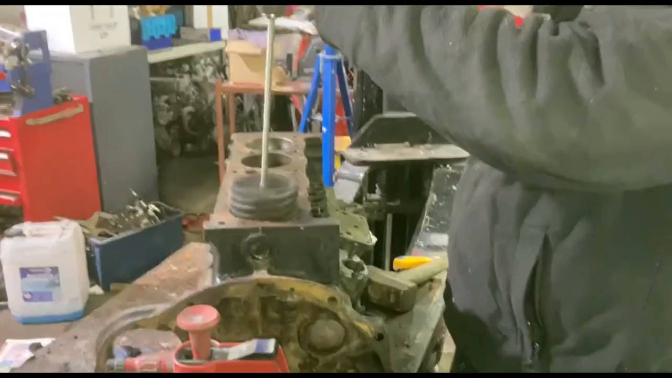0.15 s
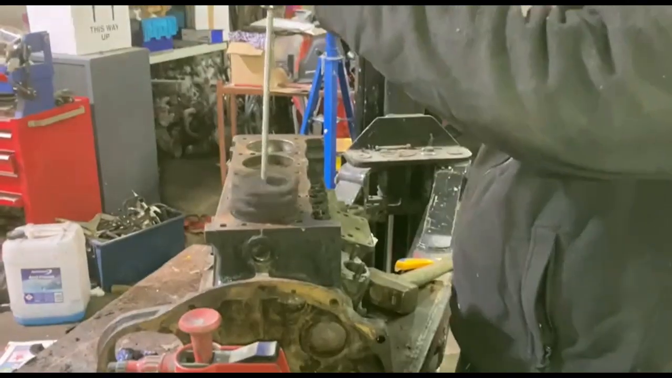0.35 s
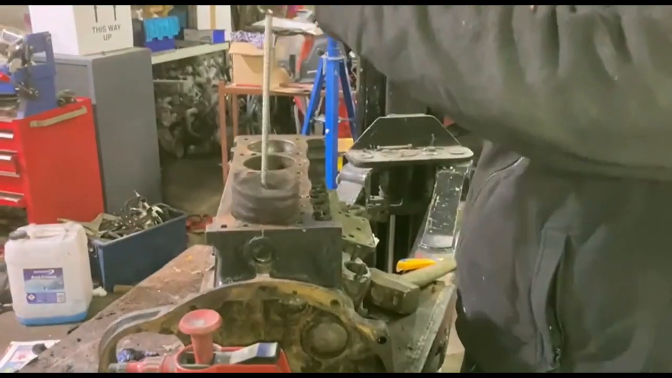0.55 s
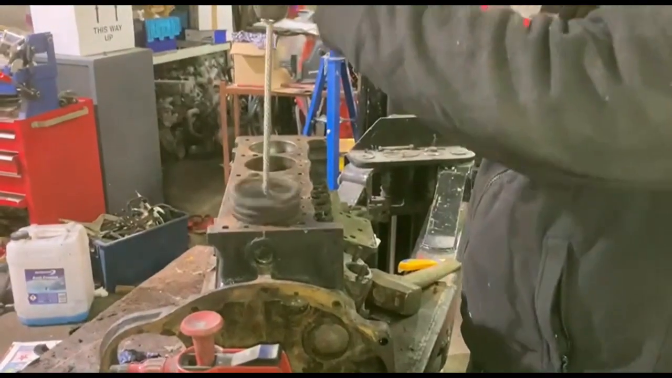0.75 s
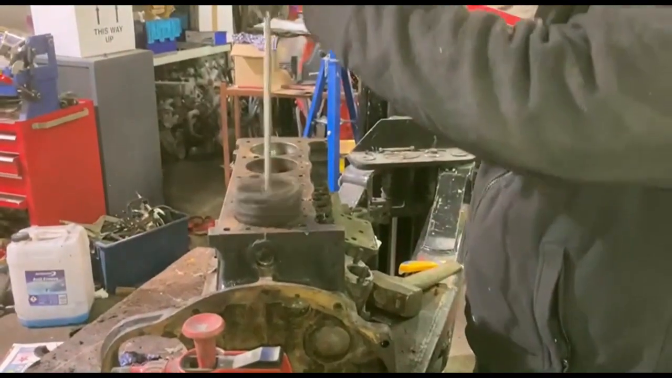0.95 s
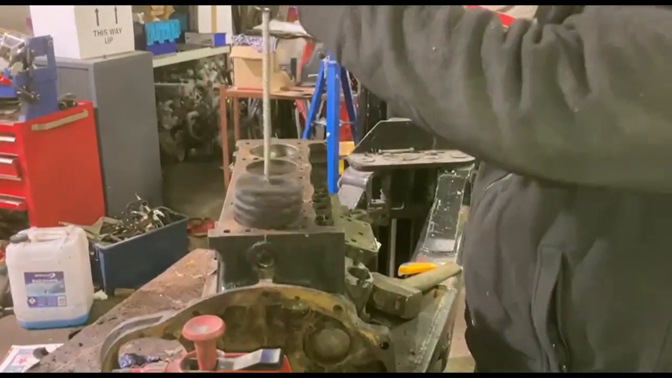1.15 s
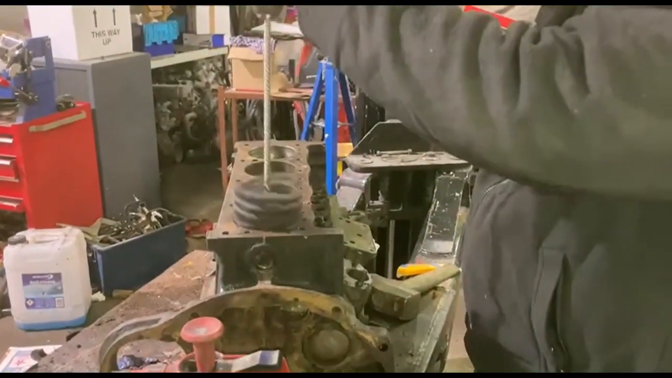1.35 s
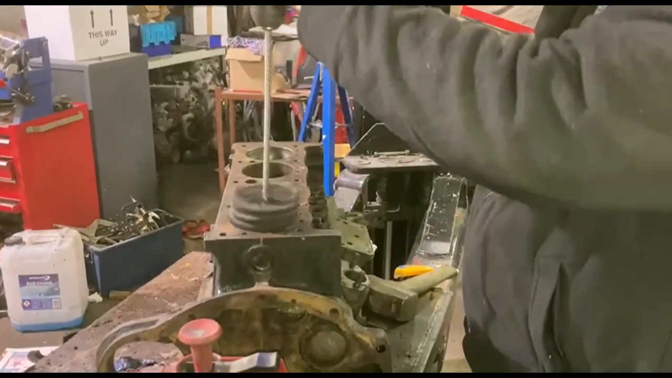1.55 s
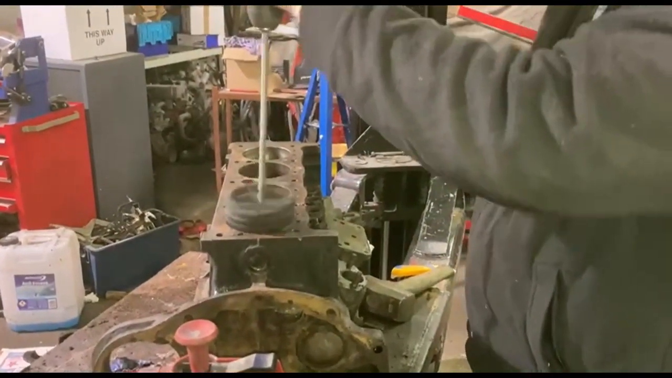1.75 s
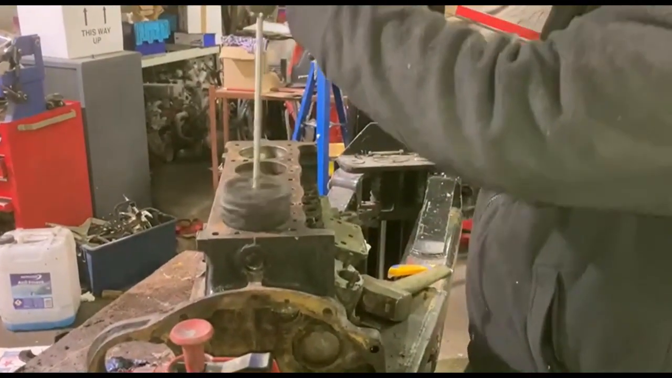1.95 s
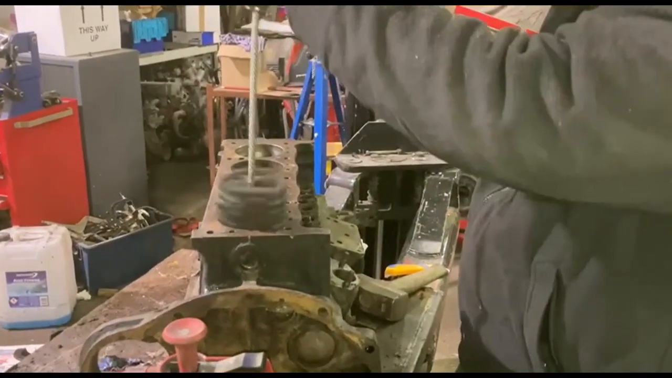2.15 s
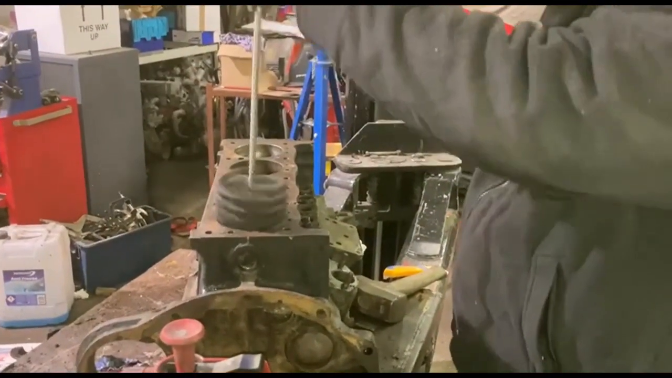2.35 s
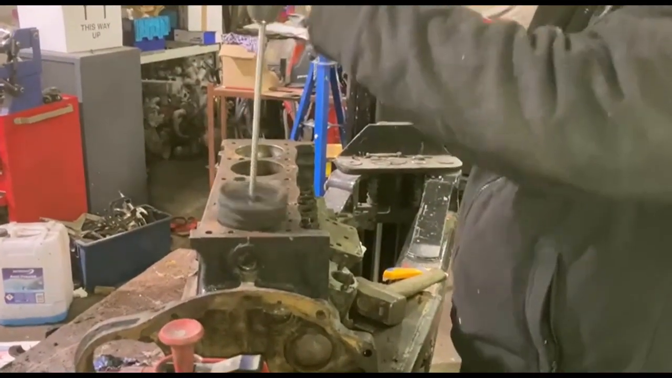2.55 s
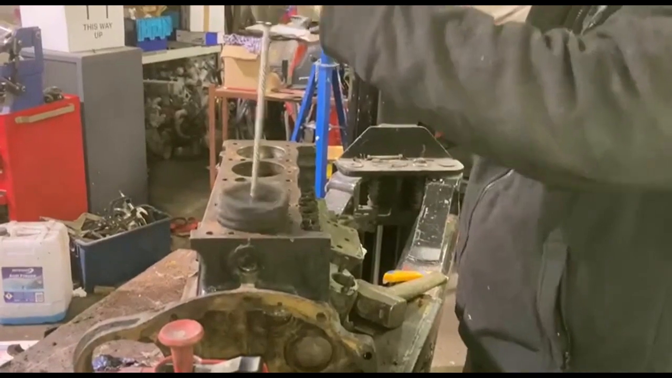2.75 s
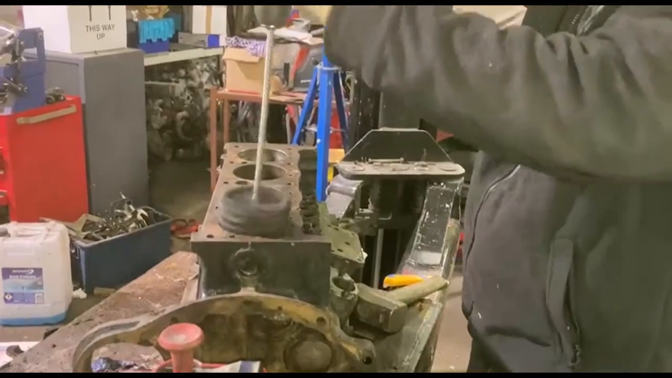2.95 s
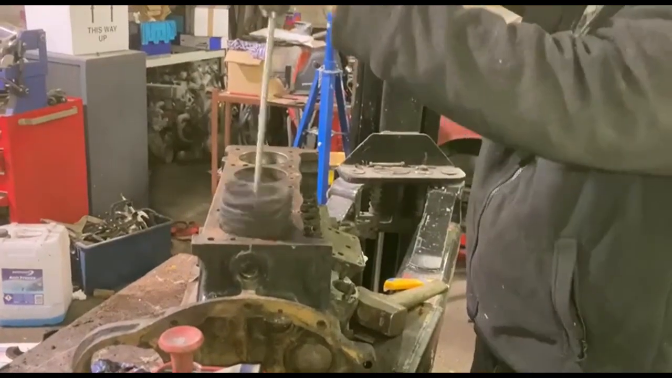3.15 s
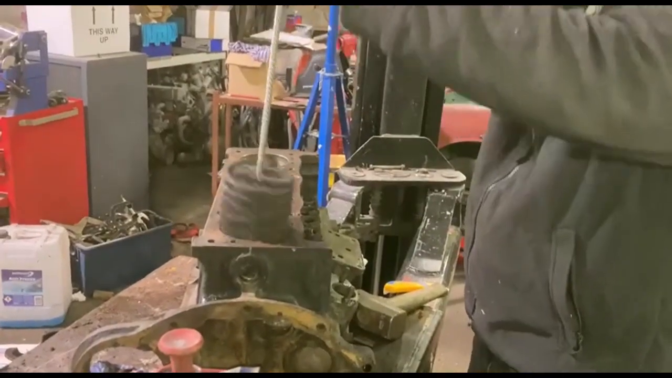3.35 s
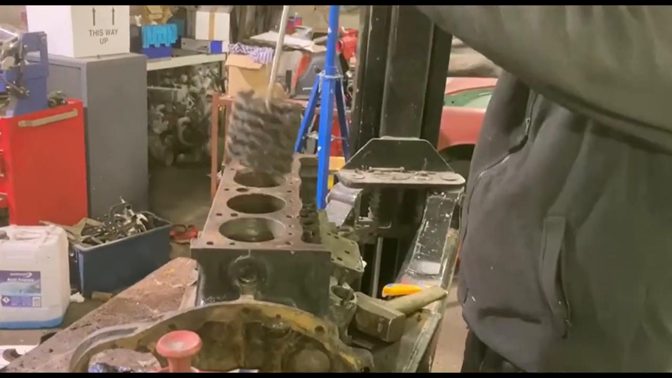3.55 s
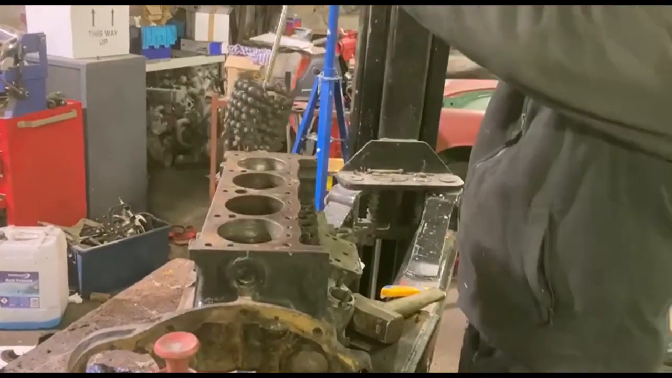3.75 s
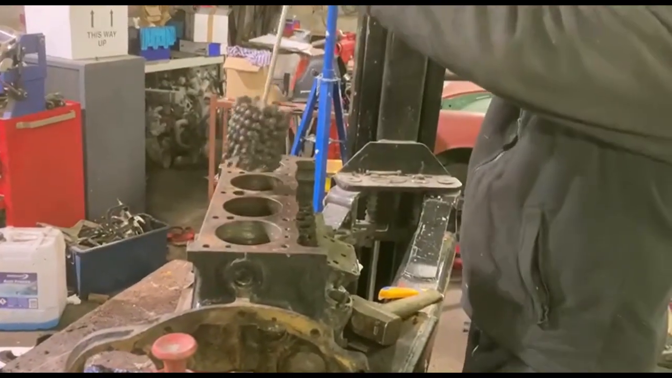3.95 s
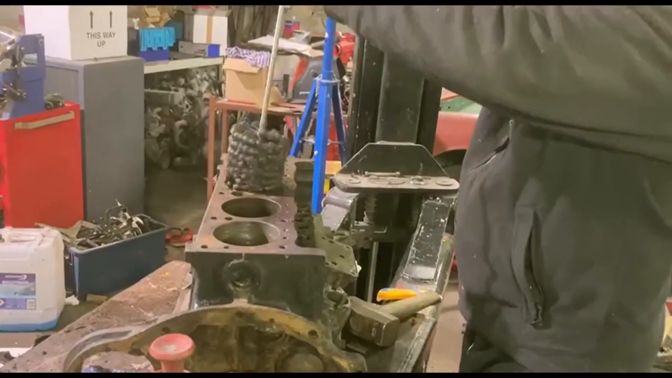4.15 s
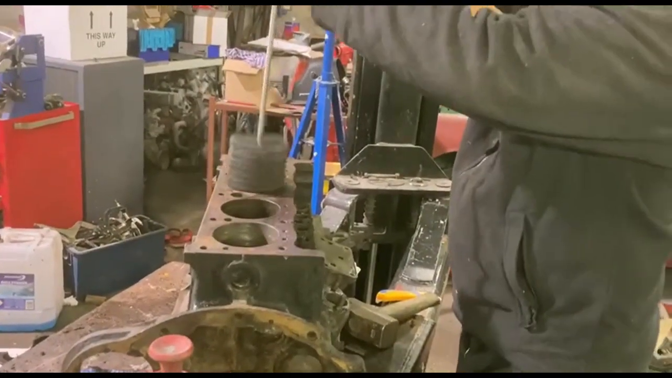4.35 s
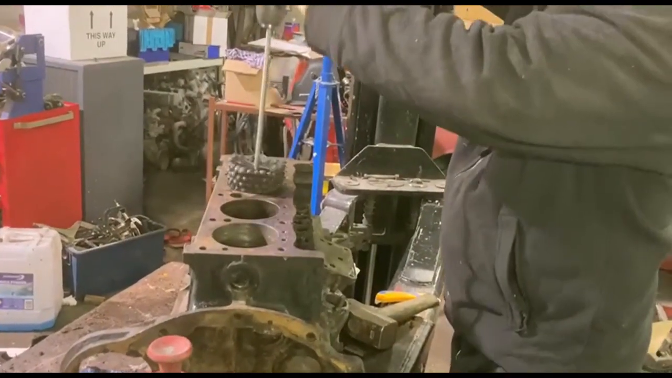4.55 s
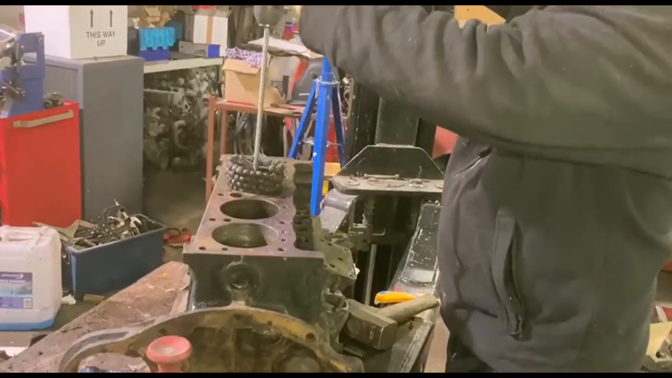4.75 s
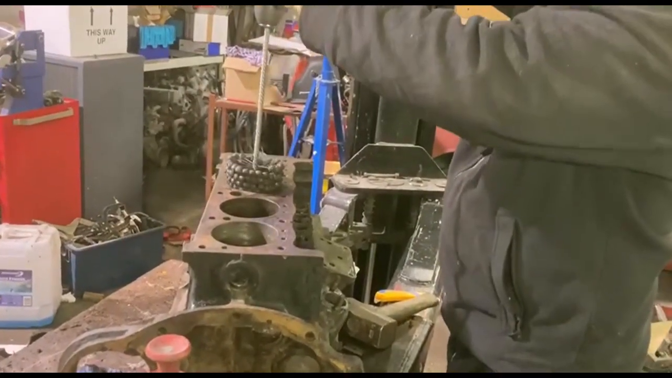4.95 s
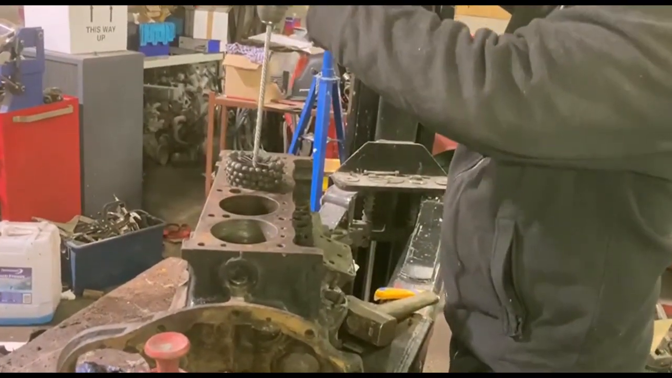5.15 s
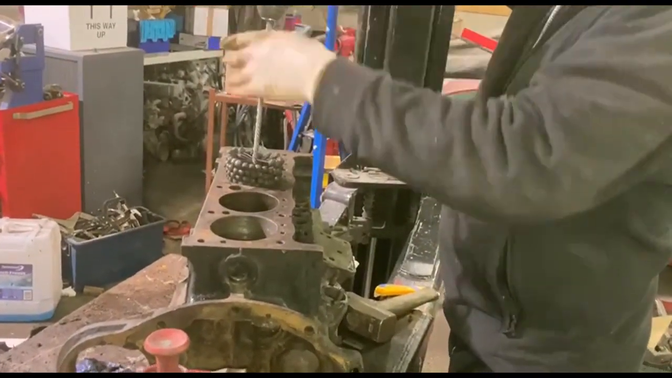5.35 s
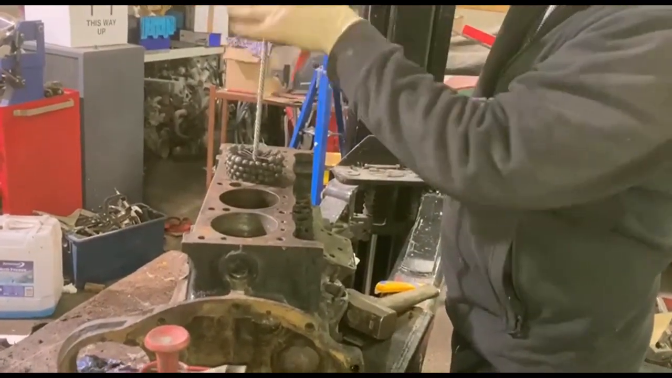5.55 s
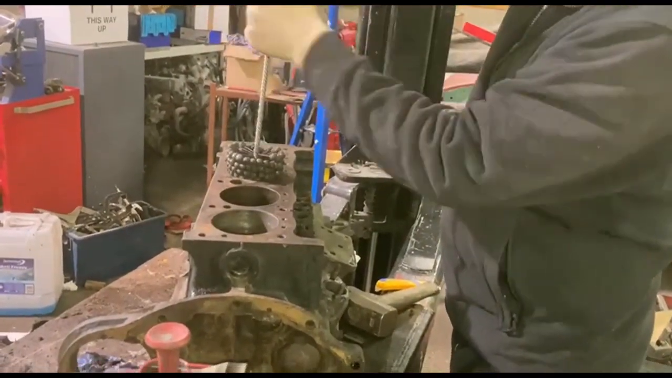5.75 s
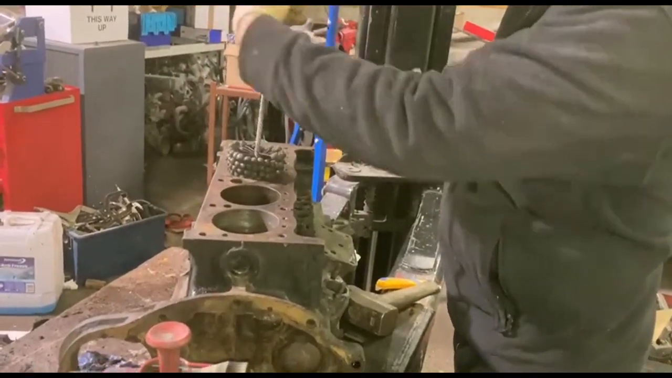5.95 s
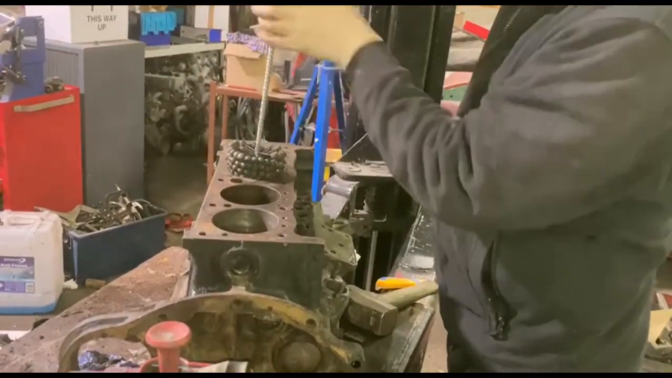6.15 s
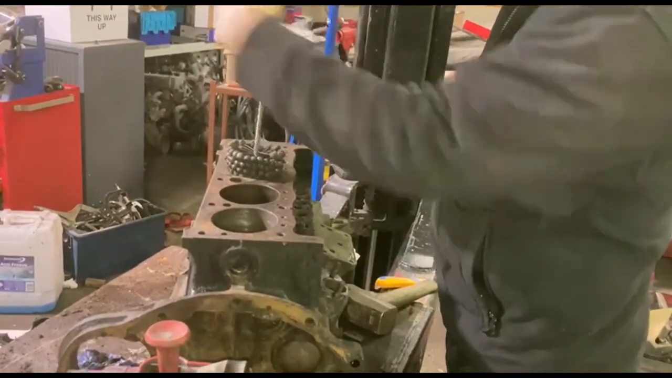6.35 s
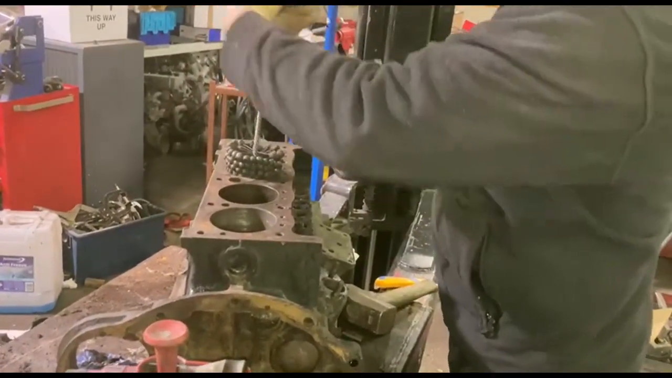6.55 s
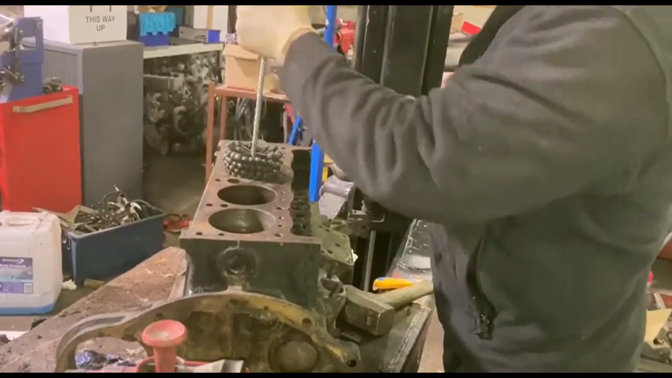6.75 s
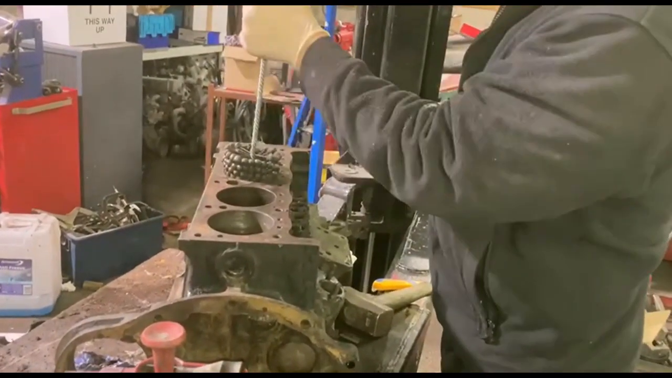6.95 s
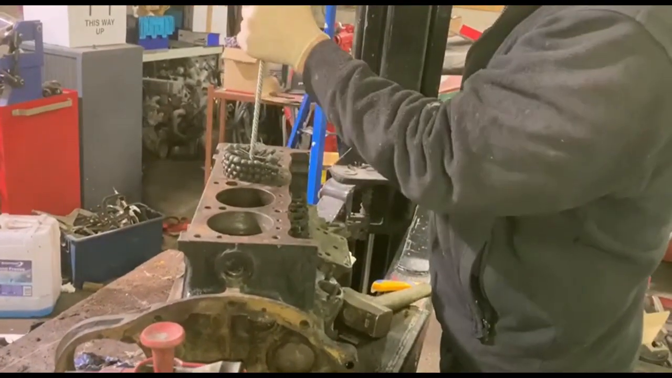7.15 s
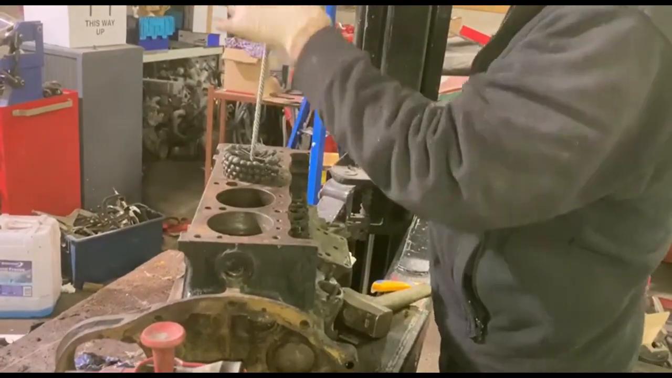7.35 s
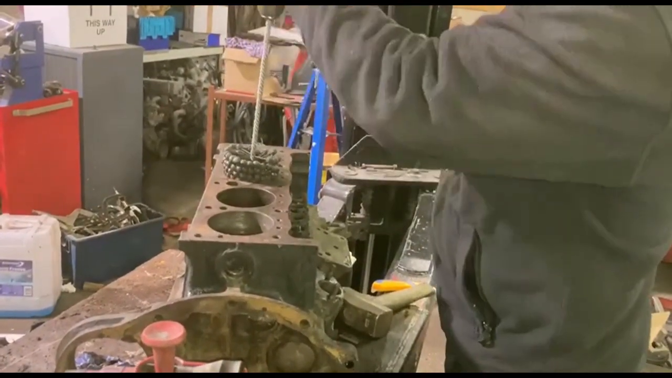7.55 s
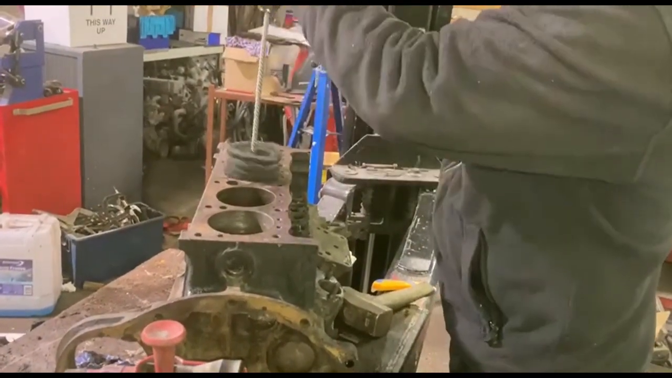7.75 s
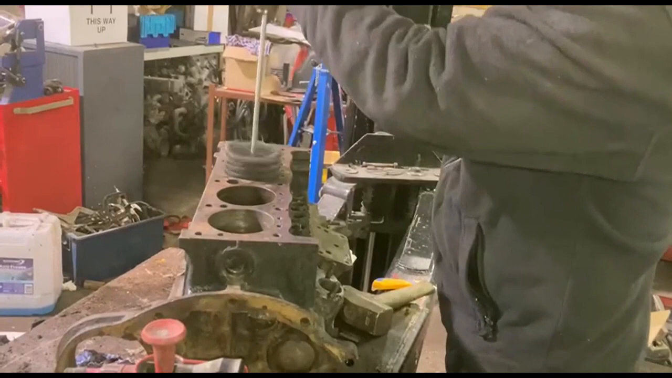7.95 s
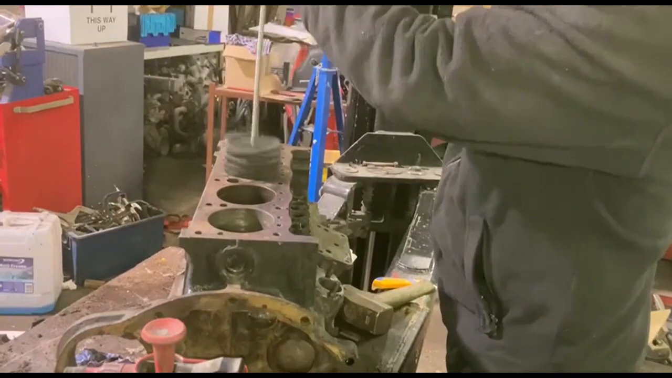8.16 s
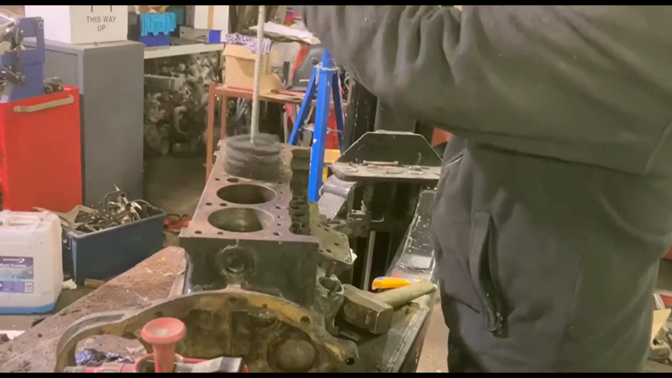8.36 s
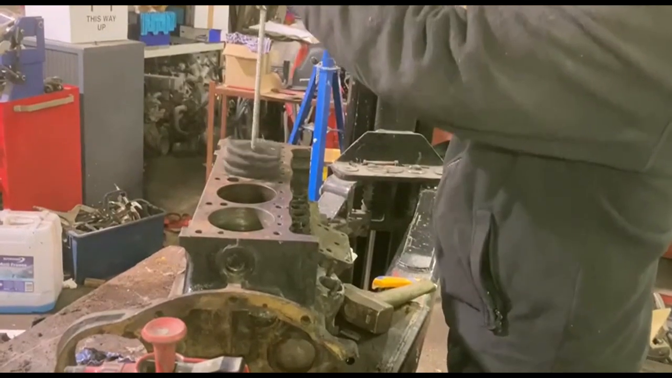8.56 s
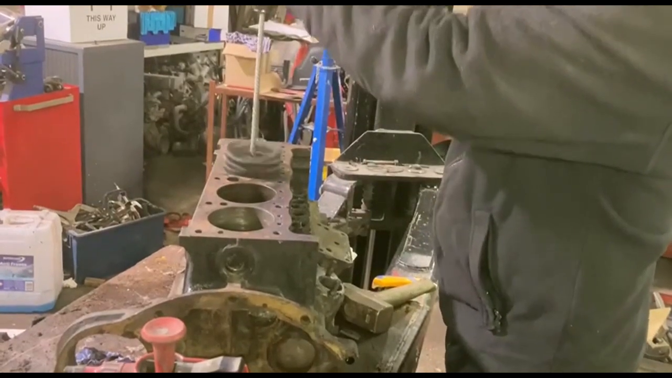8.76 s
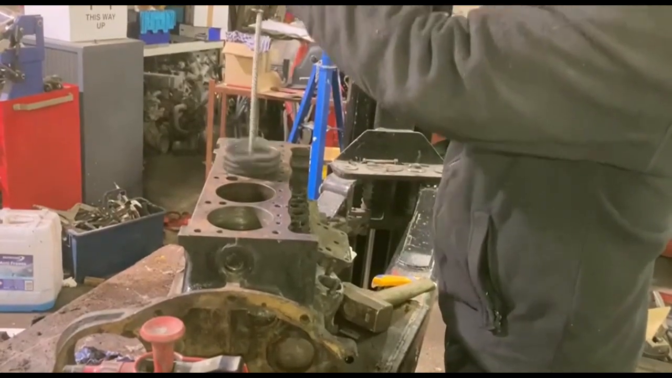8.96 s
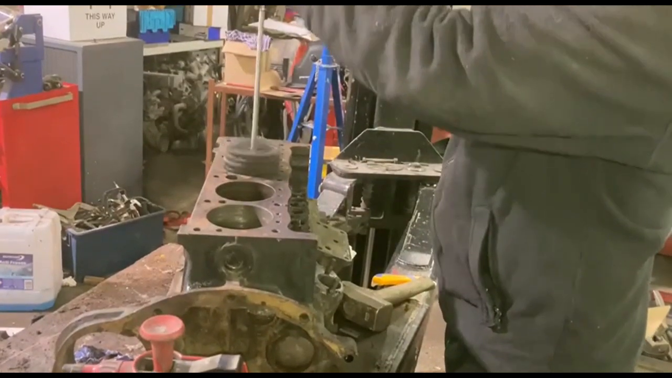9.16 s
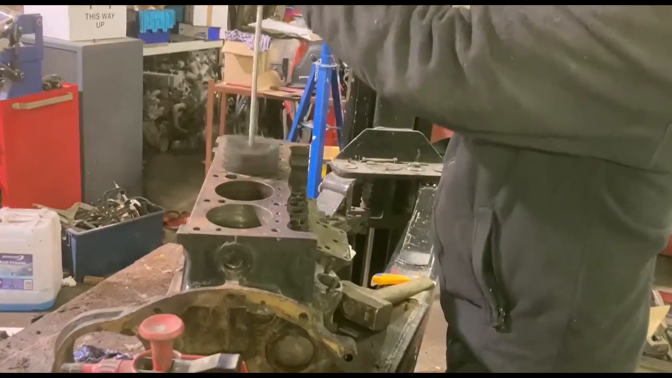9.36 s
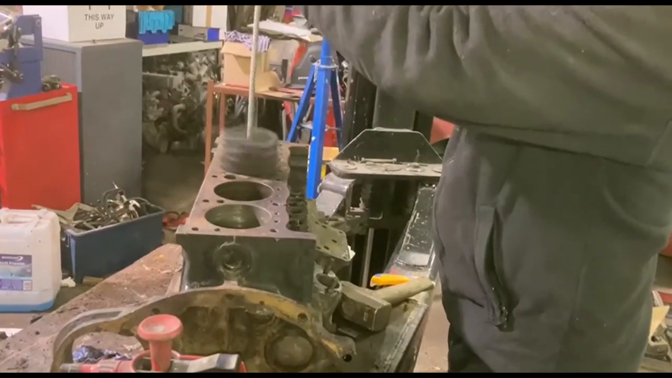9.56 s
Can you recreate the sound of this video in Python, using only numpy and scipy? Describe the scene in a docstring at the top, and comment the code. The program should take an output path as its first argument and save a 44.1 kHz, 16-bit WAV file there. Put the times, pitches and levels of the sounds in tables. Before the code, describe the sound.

A cordless drill whines as it spins a ball hone inside an iron engine block, hissing and rasping, with a booming knock about four times a second. It stops with a metallic clatter, then spins again briefly on the rim. Quiet glove rubs and chuck clicks follow before the honing and knocking resume. The sound is close, in a softly rumbling workshop with a short echo.

```python
"""A ball hone, a brush of gritty balls on stalks, hisses and rasps in the bores of an iron engine block.
A whining cordless drill spins it, and each down stroke ends in a knock that booms through the bench.
Between two bores the drill stops with a clatter and spins the hone briefly on the next rim;
then its chuck is gripped and clicked tight. The workshop echoes and rumbles softly behind it all."""
import sys
import numpy as np
from scipy import signal
from scipy.fft import rfft, irfft, next_fast_len
from scipy.io import wavfile
from scipy.ndimage import map_coordinates

SR = 44100
rng = np.random.default_rng(int(sys.argv[2]) if len(sys.argv) > 2 else 0)


def log_audio(samples):
    """Write samples as a 16-bit WAV file to the path given in sys.argv[1]."""
    # one column per channel
    frames = np.atleast_2d(samples).T
    # limit to full scale, then quantise
    limited = np.clip(frames, -1, 1)
    pcm = np.round(limited * 32767).astype(np.int16)
    wavfile.write(sys.argv[1], SR, pcm)


N = 423801
FFT_SIZE = next_fast_len(N + SR)
TIME, FREQS = np.arange(N) / SR, np.maximum(np.fft.rfftfreq(FFT_SIZE, 1 / SR), 1)
SECOND_BORE_S = 4   # work on the second bore starts here

# tone colour of the workshop's rumble: (frequency [Hz], level [dB])
RUMBLE_COLOUR = [(15, -39.5), (25, -20), (96, 10.5), (165, -10.5), (397, -4.5), (648, -18), (1090, -16),
                 (1520, -22.5), (2240, -25.5), (5390, -59.5), (7350, -31), (9030, -56.5), (10500, -39),
                 (12000, -55), (15600, -76.5), (22000, -120)]
# how long echoes ring; a ring time is the time to fade by 60 dB: (frequency [Hz], ring time [s])
ROOM_RING_TIMES = [(100, 1), (500, 0.54), (2500, 0.45), (6000, 0.65), (12000, .28)]
# how far the left microphone's wave is ahead of the right one's: (frequency [Hz], phase [rad])
MIC_PHASE = [(50, 0), (700, .3), (1400, .9), (1950, 3), (2750, .7), (3500, 1.7), (4500, 1.6), (5400, 3.1),
             (6200, 1.1), (6900, 0), (7600, -.8), (8200, -1.9), (8550, -2.85), (9450, -3.35), (10300, -4.9),
             (11000, -6.1), (11700, -6.28)]

# tone colour of the drill's plastic shell: (frequency [Hz], level [dB])
SHELL_COLOUR = [(120, -22), (400, -17.5), (750, 3.5), (1100, -4), (1650, 3), (2200, -4.5), (3100, -10),
                (4600, -15.5), (7000, -12), (11000, -23.5), (13000, -29)]
# short rattles of the spindle lock, loose balls and chuck:
# (time [s], level [dB], fade time [s], sleeve ring offset [dB], treble offset [dB])
RATTLES = [(3.379, -35, 0.006, -19, 10), (3.387, -30.5, .009, -26, 3), (3.585, -51.5, .002, -18, 9),
           (3.990, -56, .002, -19, -2), (4.073, -46, .002, -19, 10), (4.097, -57, .0015, -20, 17),
           (4.114, -37.5, .008, -20, -6), (5.283, -46, 0.0065, 11.5, 9), (5.289, -43.5, 0.0028, 2, 12),
           (5.300, -41, 0.0032, -8, 0), (5.673, -28, 0.002, -14, -3), (5.862, -59, 0.0035, -23, 15),
           (5.882, -59.5, 0.0032, -23, 13.5), (6.019, -43, 0.0054, -30, -14), (6.038, -49, .01, -21, -16),
           (6.418, -52.5, 0.0035, -20, -9), (6.452, -51, 0.0025, -21, -9), (6.526, -44, 0.0015, -24, 2),
           (6.554, -43, .0025, -22, -4), (6.564, -45, .005, -18, -2), (6.632, -44.5, 0.0063, -25, -19),
           (6.706, -38, 0.0059, -28, -9), (6.782, -53, .004, -15.5, -10), (6.854, -42.5, .006, -26.5, -6),
           (6.876, -47.5, 0.02, -25, -17), (7.233, -53, 0.0032, -20, -8), (7.383, -53, 0.0015, -19, -11),
           (7.454, -58.5, 0.01, -21, -13), (7.643, -46, .004, -22, 6)]
# notes of the chuck's steel sleeve: (pitch [Hz], ring time [s])
SLEEVE_NOTES = [(3400, 0.012), (3600, .018), (3850, .008)]
# notes of the chuck's steel jaws: (pitch [Hz], level [dB], ring time [s])
JAW_NOTES = [(3278, 0, .16), (3435, -2, .3), (3660, -2.5, .22), (3838, -9, .3), (4091, -5, .3)]
# blows that set the jaws ringing: (time [s], level [dB])
JAW_HITS = [(5.285, -48.5), (5.673, -55), (6.02, -65)]
# bumps and pings of handling, and the hollow knocks of the first two strokes in the second bore:
# (time [s], level [dB], pitch [Hz], ring time [s])
BUMPS_AND_KNOCKS = [(4.540, -29.5, 330.6, 0.049), (4.762, -34, 336, .16), (4.80, -39, 230, .12),
                    (4.945, -44.5, 241.7, 0.058), (5.055, -42, 370, 0.1), (5.293, -44, 376, 0.1),
                    (5.672, -29, 663, .018), (5.673, -27, 860, 0.021), (6.528, -37, 1669, .03),
                    (6.556, -42, 1650, .025), (6.631, -38.5, 960, .03), (6.708, -43, 227, 0.085),
                    (6.707, -40, 1483, .02), (6.857, -43, 207.6, 0.075), (6.856, -32, 1394, .025),
                    (7.262, -50, 230, .09), (7.383, -42, 1620, .028), (7.453, -46, 205, .09),
                    (7.935, -19, 356, 0.063), (7.936, -16.5, 440, .06), (7.934, -26, 850, .05),
                    (8.160, -18.5, 409, .06)]
# notes of the hone's steel shaft, damped by its balls: (pitch [Hz], level [dB], ring time [s])
SHAFT_NOTES = [(775, -3, .035), (1060, -2, .04), (1400, -8, .04), (1660, -3.5, .05), (1901, -11, .12),
               (2190, -1.5, .065), (2560, -.5, .07), (2930, 0, .06), (3076, -1.5, .08), (3260, -2.5, .045),
               (4043, -4, .055), (4238, -3.5, .06), (4550, -3.5, .065), (4737, -3, .055), (5820, -4, .025),
               (6050, -5, .025)]
# blows to the shaft as the spindle locks: (time [s], level [dB])
SHAFT_HITS = [(3.3795, -32), (3.386, -27), (3.3885, -27), (3.3915, -26), (3.3985, -26.5), (3.419, -37),
              (3.494, -48)]

# trigger pulls: (pulled [s], released [s], run-up time [s], braking time [s], whine level [dB])
TRIGGER_PULLS = [(-1, 3.43, .038, .16, -53.5), (4.1, 4.93, .018, .095, -46),
                 (7.632, 9.7, .038, .095, -53.5)]
# tones in the motor's whine: (pitch [multiple of motor speed], level [dB])
MOTOR_TONES = [(1, -23), (2, -0.5), (4, -14.5)]
# the motor sings out as it runs up:
# (time [s], pitch [multiple of motor speed], level [dB], rise [s], fall [s])
MOTOR_SURGES = [(4.175, 2, -32, .018, .022), (4.175, 1, -44, .015, .02), (7.725, 5, -31, .016, .018),
                (7.752, 2, -30, .022, .045)]

# the hone hits the bottom of a stroke: (time [s], clank level [dB], boom level [dB],
# tip crack level [dB], boom hardness [dB/octave], clank brightness [dB/octave])
STROKE_ENDS = [(0.371, -13.5, -29.3, -27, 1.5, -2), (0.673, -7.5, -23, -15.5, -.7, -4),
               (0.935, -13, -23.7, -20.5, -1, 3), (1.185, -11.5, -22, -13.5, -2, 3),
               (1.447, -21, -23.8, -21, 0, -1), (1.697, -13, -21, -15, 0, 0),
               (1.953, -16, -21.2, -14, 2.5, 4), (2.196, -20, -25, -21, -3, 0),
               (2.456, -11, -20.8, -14.5, -2.5, -1), (2.666, -9, -22.8, -14, -2.5, -5),
               (2.903, -10, -23.7, -12, -2, -1), (3.157, -14, -23.8, -23.5, -1, -1),
               (7.934, -27.5, -42, -36, 0, -2), (8.156, -22, -30, -17.5, 0.5, 7),
               (8.388, -18.5, -26, -14, 1, -3), (8.613, -18.5, -23.5, -16.5, -.5, -2),
               (8.854, -23, -24.8, -15, 1, 2), (9.089, -18, -25, -18, 1, 1), (9.306, -28, -28, -21, -.5, 3),
               (9.541, -27.5, -29, -21.5, 0, 0)]
# notes of the block on its bench:
# (pitch [Hz], ring time [s], level from the first bore [dB], level from the second bore [dB])
BLOCK_NOTES = [(86, 0.23, -3.5, -3), (104.9, .22, -15, -2), (134.5, 0.22, -18.5, -11),
               (158.6, 0.175, -2.3, -9), (184.6, 0.097, 3, 3.5), (211, 0.13, -19.5, -3.5),
               (277, 0.12, -7, -3.5), (324, 0.13, -1, -.5), (395, 0.055, -45, 2), (690, 0.055, -17, 0),
               (756, 0.05, -10, 3.5), (826, 0.034, 0.5, -2.5), (993, 0.07, -12.5, -8),
               (1350, 0.04, -12, -1), (1719, 0.047, -4, 7)]
# tone colour of the crack of the hone's tip: (frequency [Hz], level [dB])
TIP_COLOUR = [(450, -34), (800, -5), (1700, -0.5), (2600, -8), (4000, -7.5), (5000, 4), (6500, 5),
              (8000, 3.5), (10500, -0.5), (11600, -4.5), (12300, -21.5)]
# tone colour of the balls clacking together: (frequency [Hz], level [dB])
CLACK_COLOUR = [(300, -30), (560, -10), (720, 0), (950, -1), (1200, -13), (2500, -28), (6000, -50)]
# tone colour of the bench shuddering after a boom: (frequency [Hz], level [dB])
SHUDDER_COLOUR = [(45, -40), (85, -9), (150, 0), (240, -6), (330, -5), (420, -22), (600, -32), (2000, -65)]

# the hone's steady work, before trigger and strokes shape it:
# (time [s], motor speed [turns/s], hiss level [dB], rasp level [dB])
HONE_WORK = [(0.05, 395, -30, -38), (1.0, 405, -31.3, -40), (2.13, 420, -31.3, -40),
             (2.26, 296, -29, -38.5), (2.45, 316, -29, -38.5), (2.58, 299, -28.7, -38.5),
             (2.88, 302, -28.5, -38.3), (3.05, 268, -30.3, -39), (3.37, 305, -26.3, -39),
             (3.49, 300, -43.5, -38.5), (4.12, 400, -38, -44), (4.17, 398, -28, -39),
             (4.23, 400, -23, -37.5), (4.29, 390, -32.5, -39.5), (4.38, 365, -32.5, -39.5),
             (4.405, 360, -27.5, -39.5), (4.425, 352, -35, -39.5), (4.5, 343, -38.3, -38.5),
             (4.92, 341, -38.3, -38), (7.68, 385, -35, -40), (7.735, 378, -36.3, -41.3),
             (7.79, 406, -36.3, -41.3), (8.25, 415, -33.4, -42), (9.03, 420, -32.7, -41.7),
             (9.12, 286, -32.7, -40), (9.55, 300, -31, -40.3)]
# glove and sleeve brush the drill: (time [s], hiss level [dB], rasp level [dB], rise [s], fall [s])
GLOVE_RUBS = [(5.29, -55, -60, .004, .018), (5.54, -62, -72, .008, .04), (5.77, -76, -66, .04, .06),
              (6.02, -59, -59.5, .025, .14), (6.40, -61, -67, .025, .04), (6.71, -65, -62, .09, .08),
              (7.28, -58, -61, .025, .03), (7.49, -63, -68, .03, .045)]
# stalks brush the second rim: (time [s], hiss level [dB], rasp level [dB], rise [s], fall [s])
RIM_RUBS = [(4.01, -78, -63, .012, .07), (4.07, -52, -67, .005, .04)]
# a ball sticks and squeaks on the wall: (time [s], level [dB], pitch [Hz], rise [s], fall [s])
BALL_SQUEAKS = [(2.335, -33, 2640, .016, .012), (2.49, -32, 2650, .022, .022),
                (2.685, -29, 2635, .01, .048), (2.82, -37, 2740, .014, .014), (3.075, -31, 2149, .025, .04),
                (3.25, -33, 2600, .012, .014)]
# single balls snap against an edge of the bore: (time [s], level [dB])
BALL_SNAPS = [(0.4693, -17), (0.5511, -10), (0.8145, -10.5), (1.5913, -15), (1.7865, -14.5),
              (3.0889, -16.5), (3.2819, -13), (3.3364, -15.5), (3.3558, -13), (4.147, -19), (4.1769, -17),
              (4.19, -13), (4.2264, -16), (4.2453, -9.5), (8.2776, -13.5), (8.5135, -18.5), (8.5345, -14.5),
              (8.984, -16.5), (9.2444, -18), (9.413, -17)]
# tone colour of the grit's hiss: (frequency [Hz], level [dB])
HISS_COLOUR = [(3500, -24), (5000, -9.5), (6200, -3.5), (7000, 1), (8000, 4.5), (10300, 3.5), (11200, 3.5),
               (11700, -4), (12100, -22.5)]
# tone colour of the rasp inside a bore: (frequency [Hz], level [dB])
BORE_RASP_COLOUR = [(45, -22), (90, -9), (250, -9), (335, -5), (480, -8), (630, -3.5), (830, 3),
                    (1100, -5.5), (1680, .3), (1950, -2.5), (2250, -2), (2600, -5), (2900, -6), (3400, -7),
                    (4000, -5.8), (4800, -8), (7000, -18)]
# tone colour of the rasp on the rim: (frequency [Hz], level [dB])
RIM_RASP_COLOUR = [(45, -22), (90, -9), (250, -6), (335, -3), (480, -4), (630, -3), (800, 3), (1100, -3),
                   (1400, 2), (1900, -6), (2300, -4), (3050, -1.5), (3400, -7.5), (4400, -10),
                   (5300, -13.5), (6150, -4.5), (7200, -5), (9000, -22)]


def from_db(db):
    """Turn decibels into a number to multiply by."""
    return 10 ** (np.asarray(db) / 20)


def unit_level(x):
    """Scale a signal so that its average strength (rms) is 1."""
    return x / np.sqrt(np.mean(x ** 2) + 1e-20)


def over_time(rows):
    """Join the rows of a timed table into one curve per column."""
    times, *columns = np.transpose(rows)
    return [np.interp(TIME, times, column) for column in columns]


def at_hz(table, hz):
    """Look up a frequency in a table, with octaves evenly spaced."""
    freqs, values = np.transpose(table)
    return np.interp(np.log(hz), np.log(freqs), values)


def drift(rate):
    """A random wander of size 1 that changes about rate times a second."""
    return unit_level(np.interp(TIME * rate, np.arange(N), rng.standard_normal(N)))


def coloured(x, colour):
    """Give a sound a tone colour; white noise keeps its level."""
    cepstrum = irfft(np.log(unit_level(from_db(at_hz(colour, FREQS)))), FFT_SIZE)
    # folding this way makes the filter ring after a hit, never before it
    cepstrum[1:FFT_SIZE // 2] *= 2
    cepstrum[FFT_SIZE // 2 + 1:] = 0
    return irfft(rfft(x, FFT_SIZE) * np.exp(rfft(cepstrum)), FFT_SIZE)[..., :N]


def ring(clicks, hz, ring_s):
    """Each click starts a fading pure tone as strong as the click."""
    decay, step = from_db(-60 / (ring_s * SR)), 2 * np.pi * hz / SR
    return signal.lfilter([0, np.sin(step)], [1, -2 * decay * np.cos(step), decay ** 2], clicks + 1e-18)


def high_pass(x, hz):
    """Turn down everything below hz."""
    return signal.sosfilt(signal.butter(2, hz, "high", fs=SR, output="sos"), x)


def bursts(times, levels_db, fade_s):
    """Rough contacts: noise that starts at once and dies away."""
    envelope = np.zeros(N)
    for at, db, fade in zip(times, levels_db, fade_s * np.ones(len(times))):
        span = envelope[int(at * SR):][:SR // 4]
        span += from_db(db) * np.exp(-TIME[:len(span)] / max(fade, 1e-4))
    return envelope * rng.standard_normal(N)


def grains(per_s, spread_db):
    """Tiny impacts of uneven size at random times."""
    sizes = from_db(spread_db * np.minimum(rng.exponential(1, N), 6))
    return unit_level(sizes * rng.choice([-1, 1], N) * (rng.random(N) < per_s / SR))


def swell(at, rise_s, fall_s):
    """A curve that grows to a sharp peak of 1 and dies away."""
    out = np.zeros(N)
    near = slice(*np.searchsorted(TIME, [at - 10 * rise_s, at + 10 * fall_s]))
    out[near] = np.exp(-np.maximum((at - TIME[near]) / rise_s, (TIME[near] - at) / fall_s))
    return out


def swells(times, rise_s, fall_s):
    """The same swell at each of the times."""
    return sum(swell(at, rise_s, fall_s) for at in times)


def hump(at, rise_s, fall_s):
    """A curve with a rounded peak of 1."""
    distance = np.maximum((at - TIME) / rise_s, (TIME - at) / fall_s)
    return np.exp(-.5 * np.minimum(distance, 10) ** 2)


def workshop_rumble():
    """Low, steady noise, a little different on the left and right."""
    middle, side = coloured(rng.standard_normal((2, N)), RUMBLE_COLOUR)
    width = (.12 * side + .7 * high_pass(side, hz=600)) * np.array([[1], [-1]])
    return from_db(-58.3 + 1.2 * drift(rate=9)) * (middle + width)


def workshop_echoes(x):
    """A wash of echoes, different at each microphone; the bass lasts longest."""
    tail, t = 0, TIME[:SR * 3 // 4]
    edges_hz = np.geomspace(50, 14000, 9)
    for low, high in zip(edges_hz, edges_hz[1:]):
        band_filter = signal.butter(2, [low, high], "band", fs=SR, output="sos")
        band = signal.sosfilt(band_filter, rng.standard_normal((2, len(t))))
        tail = tail + band * from_db(-60 * t / at_hz(ROOM_RING_TIMES, np.sqrt(low * high)))
    tail = tail * (t > .003) * (1 + 5.4 * np.exp(-t / .012))   # bench and body reflect first
    echoes = signal.fftconvolve(x[None], unit_level(tail) / np.sqrt(len(t)), axes=1)[:, :N]
    # the moving tool and arm keep changing the echo paths
    return np.array([map_coordinates(side, [(TIME + .0005 * drift(rate=9)) * SR], order=3)
                     for side in echoes])


def microphones(x):
    """Direct sound reaches the left and right microphones out of step."""
    right = irfft(rfft(x, FFT_SIZE) * np.exp(-1j * at_hz(MIC_PHASE, FREQS)), FFT_SIZE)[:N]
    return np.array([x, right])


def loose_parts():
    """Small loose parts tick at random while the drill is handled."""
    handled = (TIME > 5.8) & (TIME < 6.92)
    return from_db(-70) * coloured(handled * grains(per_s=70, spread_db=2.2), SHELL_COLOUR)


def bumps_and_knocks():
    """Short rings: handling bumps and pings, and hollow knocks on the second bore's first two strokes."""
    out = sum(from_db(db) * ring(signal.unit_impulse(N, int(at * SR)), hz, ring_s)
              for at, db, hz, ring_s in BUMPS_AND_KNOCKS)
    return high_pass(out, hz=130)


def chuck():
    """Small catches rattle through the plastic shell and ring the steel sleeve and jaws."""
    times, db, fade_s, sleeve_db, treble_db = np.transpose(RATTLES)
    shell = coloured(bursts(times, db, fade_s), SHELL_COLOUR)
    treble = high_pass(coloured(bursts(times, db + treble_db, fade_s), SHELL_COLOUR), hz=2490)
    strikes = bursts(times, db + sleeve_db, fade_s)
    sleeve = .15 * sum(ring(strikes, hz, ring_s) for hz, ring_s in SLEEVE_NOTES)
    snaps = sum(from_db(hit_db) * signal.unit_impulse(N, int(at * SR)) for at, hit_db in JAW_HITS)
    jaws = sum(from_db(note_db) * ring(snaps, hz, ring_s) for hz, note_db, ring_s in JAW_NOTES)
    return from_db(3) * (shell + treble + sleeve) + jaws


def spindle_lock():
    """The shaft clatters to a halt; each blow rings its notes in a different mix."""
    times, db = np.transpose(SHAFT_HITS)
    out = np.zeros(N)
    for hz, note_db, ring_s in SHAFT_NOTES:
        strengths = from_db(db + note_db + rng.normal(0, 1.5, len(times)))
        starts = times + rng.uniform(0, 1 / hz, len(times))
        blows = np.zeros(N)
        blows[(starts * SR).astype(int)] = strengths
        out += ring(blows, hz, ring_s)
    return out


def spin():
    """Share of working speed: the motor runs up at each trigger pull and brakes on release."""
    share = np.zeros(N)
    for pulled, released, run_up_s, brake_s, _ in TRIGGER_PULLS:
        t = TIME[TIME > pulled]
        run_up = 1 - np.exp((pulled - t) / run_up_s)
        share[TIME > pulled] = run_up * np.exp(-np.maximum(t - released, 0) / brake_s)
    return share


def stroke_spans():
    """Start and end time of each full up-and-down stroke within one bore."""
    times = [row[0] for row in STROKE_ENDS]
    return [(a, b) for a, b in zip(times, times[1:]) if (a < SECOND_BORE_S) == (b < SECOND_BORE_S)]


def stroke_speed(depth=.03, fastest_at=.75):
    """The motor slows after the bottom of each stroke and recovers before the next."""
    swing = np.zeros(N)
    for start, end in stroke_spans():
        inside = (TIME >= start) & (TIME < end)
        progress = (TIME[inside] - start) / (end - start)
        swing[inside] = np.cos(2 * np.pi * (progress - fastest_at))
    return 1 + depth * swing


def gear_squeal(speed, angle, teeth=9, case_hz=2630, width_hz=220):
    """The gear teeth squeal when they meet at the rate at which their case rings."""
    roughness = .8 * drift(rate=450)   # the teeth sit loosely
    in_tune = 1 / (1 + ((teeth * speed - case_hz) / width_hz) ** 2)
    db = np.where(TIME < SECOND_BORE_S, -44, -36.5) + 3.9 * drift(rate=55)
    return in_tune * from_db(db) * np.sin(teeth * angle + roughness)


def drill(free_turns_per_s=410):
    """Motor and gear tones sag and waver; the whine grows as the hone drags the motor down."""
    working_speed, turning = over_time(HONE_WORK)[0], spin()
    speed = working_speed * turning * stroke_speed()
    strain_db = 34 * (1 - working_speed / free_turns_per_s)
    pull_db = np.zeros(N)
    for pulled, *_, db in TRIGGER_PULLS:
        pull_db[TIME > pulled] = db
    angle = 2 * np.pi * np.cumsum(speed * (1 + .011 * drift(rate=150))) / SR
    whine = sum(from_db(db + 3.4 * drift(rate=70)) * np.sin(k * angle) for k, db in MOTOR_TONES)
    surges = sum(from_db(db + 1.5 * drift(rate=90)) * hump(at, rise_s, fall_s) * np.sin(k * angle)
                 for at, k, db, rise_s, fall_s in MOTOR_SURGES)
    running = from_db(pull_db + strain_db) * whine + gear_squeal(speed, angle)
    # a slower gear hums while the hone spins on the rim
    hum = from_db(-49) * hump(at=4.66, rise_s=.08, fall_s=.08) * np.sin(2 / 3 * angle)
    return turning ** 3.6 * running + surges + hum


def block_ring():
    """Each stroke booms in the bench (low notes) and clanks in the iron (high notes)."""
    out = np.zeros(N)
    for at, clank_db, boom_db, _, hardness, brightness in STROKE_ENDS:
        for hz, ring_s, first_db, second_db in BLOCK_NOTES:
            if hz < 500:
                db = boom_db + 4.5 + hardness * np.log2(hz / 160)
            else:
                db = clank_db - 7.2 + brightness * np.log2(hz / 830)
            db += (first_db if at < SECOND_BORE_S else second_db) + rng.normal(0, 1.5)
            pitch = hz * (1 + .018 * rng.normal())   # the block rocks, so each blow is tuned anew
            arrival = at + .045 / np.sqrt(hz)   # low bending waves travel slowest
            span = out[int(arrival * SR):][:SR // 2]
            span += from_db(db) * ring(signal.unit_impulse(len(span)), pitch, ring_s)
    return high_pass(high_pass(out, hz=68), hz=64)


def stroke_knocks():
    """The hone hits bottom: the block rings, the tip cracks, the balls clack, the bench shudders."""
    ringing = block_ring()
    times, clank_db, boom_db, tip_db, *_ = np.transpose(STROKE_ENDS)
    crack = coloured(bursts(times, tip_db + 2.6, fade_s=.0017), TIP_COLOUR)
    clack = coloured(bursts(times + .001, clank_db - 17, fade_s=.006), CLACK_COLOUR)
    shudder_db = boom_db + np.where(times < SECOND_BORE_S, -11.5, -13)
    shudder = coloured(bursts(times + .028, shudder_db, fade_s=.055), SHUDDER_COLOUR)
    return ringing + crack + clack + shudder


def squeaks():
    """A ball sticks and slips on the wall, making a short, rough tone."""
    waver = .4 * drift(rate=90) + .35 * drift(rate=500)
    rough_db = 2.2 * drift(rate=160)
    return sum(from_db(db + rough_db) * hump(at, rise_s, fall_s) * np.sin(2 * np.pi * hz * TIME + waver)
               for at, db, hz, rise_s, fall_s in BALL_SQUEAKS)


def wobble():
    """The unbalanced hone shakes the drill when it spins clear of the bore."""
    shake = unit_level(high_pass(ring(rng.standard_normal(N), hz=85.5, ring_s=.055), hz=70))
    return high_pass(from_db(-48.5) * swell(at=4.8, rise_s=.13, fall_s=.09) * shake, hz=55)


def stalk_rattle(balls=56, hops_per_s=17):
    """Balls hop on the wall and each rings briefly on its stalk, at a pitch of its own."""
    out = np.zeros(N)
    for hz in np.geomspace(950, 4900, balls):
        hops = rng.integers(0, N, int(hops_per_s * N / SR))
        hop_db = 3.8 * np.minimum(rng.exponential(1, len(hops)), 3)
        clicks = np.zeros(N)
        clicks[hops] = from_db(hop_db) * rng.choice([-1, 1], len(hops))
        out += np.sqrt(hz) * ring(clicks, hz * rng.uniform(.99, 1.01), ring_s=.065)
    return unit_level(out)


def rubbing_strength():
    """Hiss and rasp follow the spin and swell with each stroke; light rubs add to them between bores."""
    _, hiss_db, rasp_db = over_time(HONE_WORK)
    bottoms = [row[0] for row in STROKE_ENDS]
    tops = [start + .6 * (end - start) for start, end in stroke_spans()]
    hiss_db += 4.5 * swells(bottoms, rise_s=.022, fall_s=.028)
    hiss_db += 2.2 * swells(tops, rise_s=.04, fall_s=.035)   # the balls bite again at the top
    rasp_db += 3.2 * swells(bottoms, rise_s=.018, fall_s=.09)
    hiss = spin() ** 2.7 * from_db(hiss_db)
    rasp = spin() ** 2 * from_db(rasp_db)
    for at, rub_hiss_db, rub_rasp_db, rise_s, fall_s in GLOVE_RUBS + RIM_RUBS:
        rub = swell(at, rise_s, fall_s)
        hiss += from_db(rub_hiss_db) * rub
        rasp += from_db(rub_rasp_db) * rub
    return hiss, rasp


def hone():
    """Grit cuts the wall in countless ticks as the balls flutter; on the rim they flutter less."""
    hiss_gain, rasp_gain = rubbing_strength()
    on_rim = np.interp(TIME, [3.9, 4, 5.15, 5.25], [0, 1, 1, 0])
    flutter_db = (1.5 * drift(rate=45) + 2 * drift(rate=420)) * (1 - .45 * on_rim)
    grit = hiss_gain * from_db(flutter_db + 1) * grains(per_s=18000, spread_db=1.9)
    snap_times, snap_db = np.transpose(BALL_SNAPS)
    snaps = bursts(snap_times, snap_db + 3, fade_s=.0009)
    hiss = coloured(grit + snaps, HISS_COLOUR)
    scrape = rasp_gain * from_db(.7 * flutter_db + .1) * grains(per_s=6000, spread_db=2.5)
    rattle = rasp_gain * spin() * from_db(-7) * stalk_rattle()
    bore_rasp = coloured((scrape + rattle) * (1 - on_rim), BORE_RASP_COLOUR)
    rim_rasp = coloured((scrape + rattle) * on_rim, RIM_RASP_COLOUR)
    shaft_push = from_db(-44.5) * scrape * (1 - .4 * on_rim)   # scraping rings the steel shaft
    shaft = sum(from_db(db) * ring(shaft_push, hz, ring_s) for hz, db, ring_s in SHAFT_NOTES)
    return hiss, bore_rasp + rim_rasp + shaft + wobble() + squeaks()


def scene():
    """Hone, drill and block stand close; the workshop answers from all round."""
    hiss, rasp = hone()
    whine = drill()
    knocks = stroke_knocks() + bumps_and_knocks() + spindle_lock()
    clicks = chuck() + loose_parts()
    direct = hiss + rasp + whine + high_pass(knocks, hz=40.7) + clicks
    to_room = (from_db(-17.5) * hiss + from_db(-4) * high_pass(rasp, hz=296) + from_db(-8.5) * whine
               + from_db(-7.5) * clicks + from_db(-9.5) * high_pass(knocks, hz=400))
    stereo = microphones(direct) + workshop_echoes(to_room)
    # the left microphone is more open in the middle range
    mids = signal.sosfilt(signal.butter(1, [1000, 6000], "band", fs=SR, output="sos"), stereo)
    return stereo + mids * np.array([[.09], [-.09]]) + workshop_rumble()


def record(dry):
    """The sound fades in quickly, the low middle is hollow, and the highest treble is cut steeply."""
    fade_in_s, hollow_hz, cutoff_hz = .03, 442, 12300
    faded = dry * from_db(-70 * np.maximum(1 - TIME / fade_in_s, 0))
    notched = signal.lfilter(*signal.iirnotch(hollow_hz, Q=2.8, fs=SR), faded)
    hollow = .66 * notched + .34 * faded
    return signal.sosfilt(signal.ellip(10, .2, 80, cutoff_hz, fs=SR, output="sos"), hollow)


dry = scene()
out = record(dry)
log_audio(out)
```